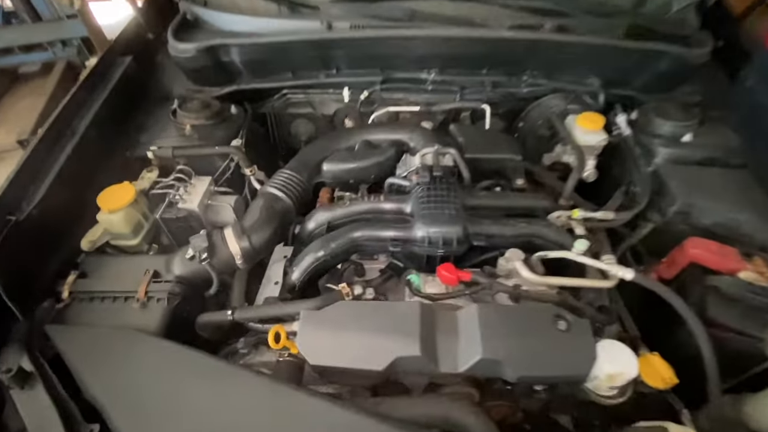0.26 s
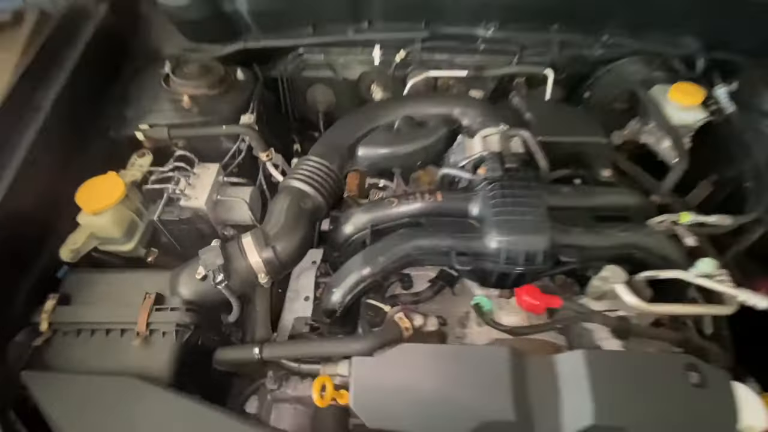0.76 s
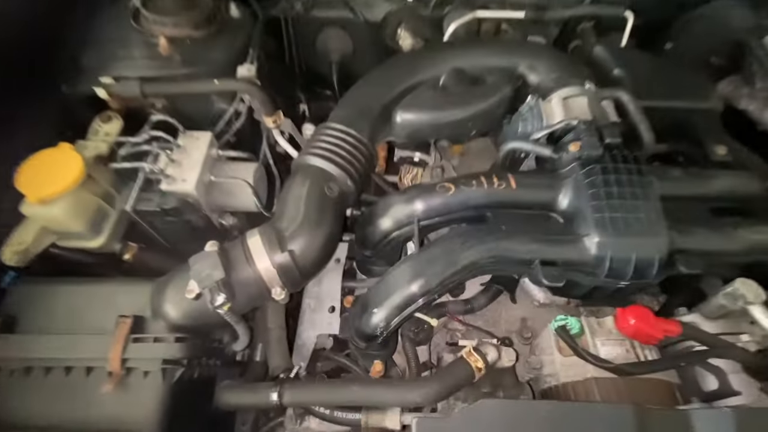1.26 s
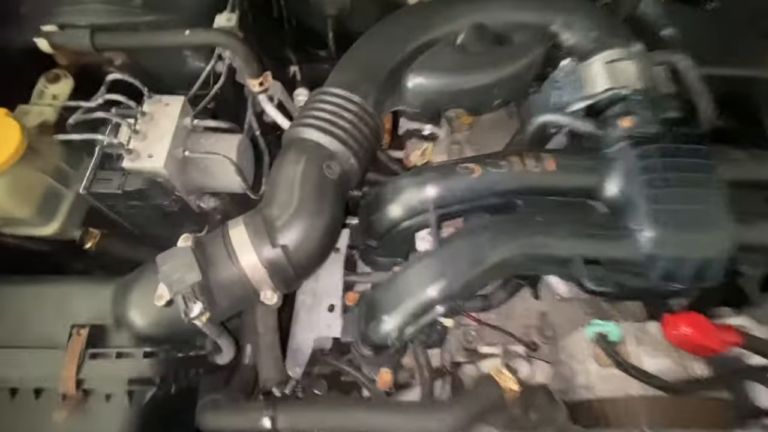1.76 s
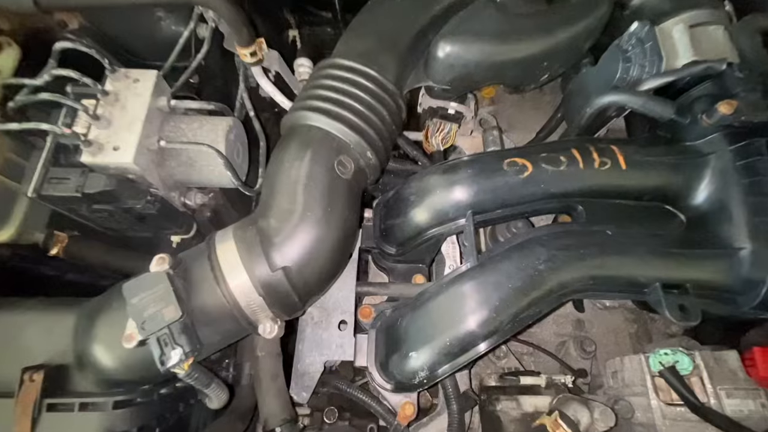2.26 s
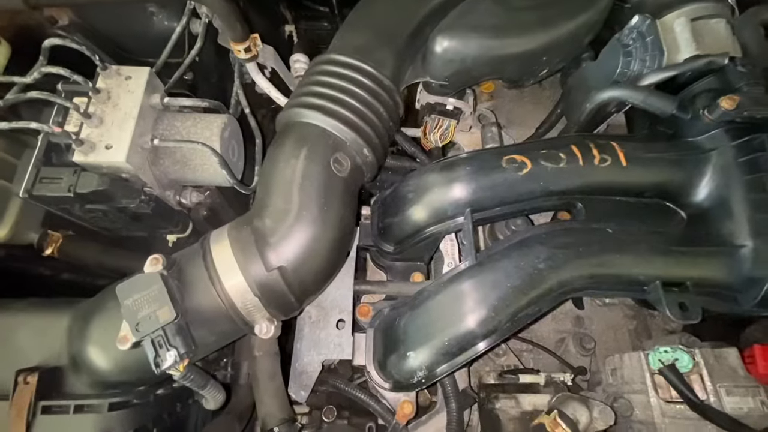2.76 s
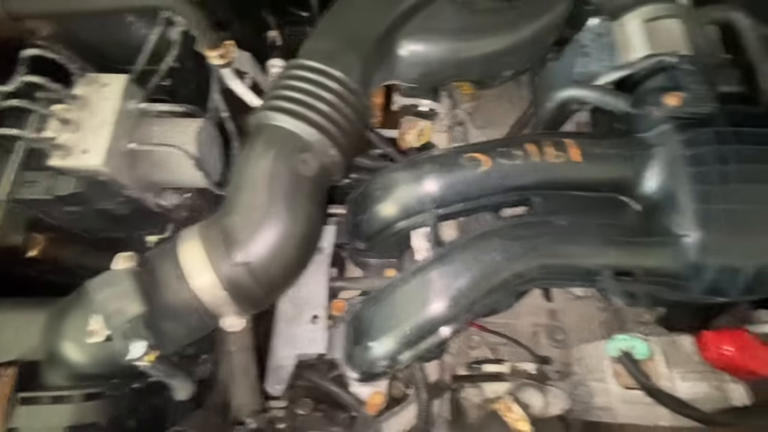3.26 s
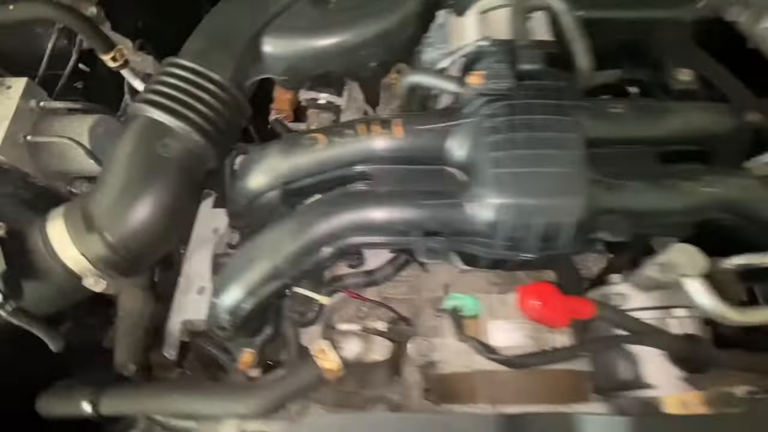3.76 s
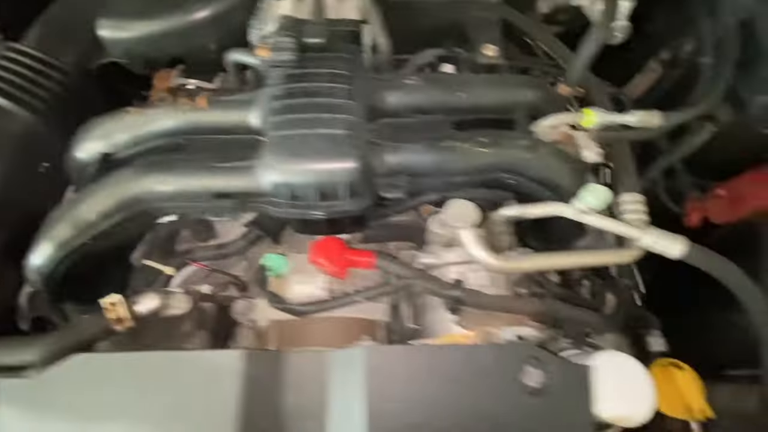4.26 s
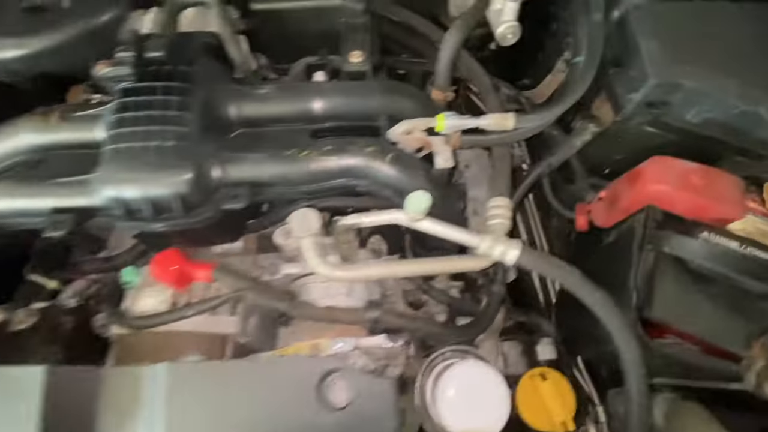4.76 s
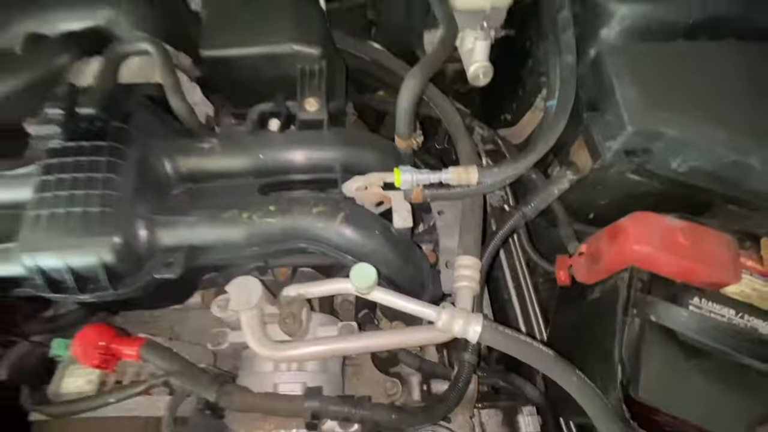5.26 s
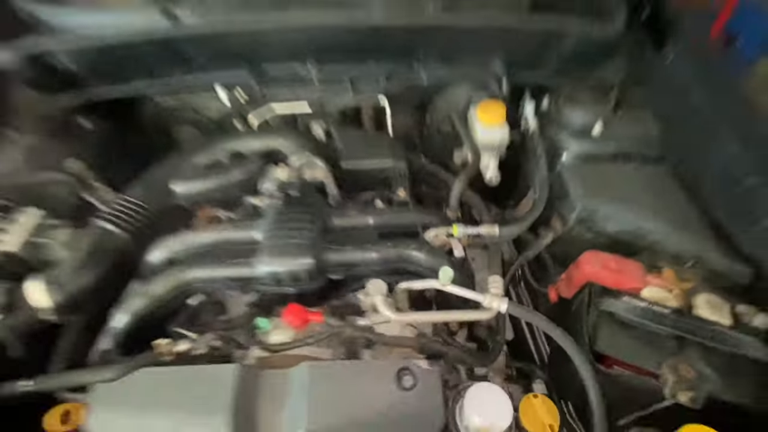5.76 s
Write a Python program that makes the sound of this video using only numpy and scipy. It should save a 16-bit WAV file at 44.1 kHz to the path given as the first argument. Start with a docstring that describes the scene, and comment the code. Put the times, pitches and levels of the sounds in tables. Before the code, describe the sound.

Rapid, hard metallic knocking runs without a break from a car engine at a fast, steady idle. Every clack carries a short ping and a hollow clank, over the engine's drone and a soft mechanical rush. The knock grows louder as the microphone nears the engine, changes colour as it passes across, and eases a little as it draws away. The garage adds a very short echo.

```python
"""A knocking engine in a garage

A four-cylinder car engine idles fast (about 1600 rpm), bonnet open. A worn rod bearing knocks once
every two turns: a steel clack, then the block and covers ring. The other cylinders slap lightly and
the firings hum. The microphone moves in from the bumper to the engine's left side, over to its right
side and back out; each place hears its own mix of the ringing tones."""
import sys
import numpy as np
from scipy import signal
from scipy.fft import rfft, irfft, next_fast_len
from scipy.io import wavfile

SR = 44100
rng = np.random.default_rng(int(sys.argv[2]) if len(sys.argv) > 2 else 0)


def generate_wav(signal):
    """Clip the signal to [-1, 1] and save it as 16-bit WAV at the path in sys.argv[1]."""
    frames = np.transpose(np.atleast_2d(signal))
    scaled = np.clip(frames, -1, 1) * 32767
    pcm = np.round(scaled).astype(np.int16)
    wavfile.write(sys.argv[1], SR, pcm)


N = 264688
TIME = np.arange(N) / SR
AGE = np.arange(SR // 11) / SR  # seconds since a blow


# tone colour of the clack: pitch_hz, level_db
CLACK_COLOUR = [(500, -21), (850, 0), (1500, -16), (2600, -4.5), (3800, -7.5), (4700, -1), (5600, -0.5),
                (6700, -5.5), (7700, -13), (9600, -8), (11500, -11.5), (13200, -16), (15300, -21.5)]
# how loud the clack is over time: time_s, level_db
CLACK_LOUDNESS = [(0, -23.5), (.8, -20.5), (1.6, -17), (2.3, -19), (3.1, -20), (3.75, -19.5), (4.1, -21.5),
                  (4.65, -22), (4.95, -21.5), (5.3, -22), (5.95, -26)]
# left channel minus right, heard from three places: bumper_db, left_side_db, right_side_db
CLACK_LEAN = [0, -2, 1.3]
# tones of the rod and crank: pitch_hz, ring_s, bumper_db, left_side_db, right_side_db
STEEL_TONES = [(3334, 0.064, -15, -6, -14), (3880, 0.022, -41, -34, -2), (4577, 0.038, -2.5, -22, -4),
               (4820, 0.013, 2, 3, -12.5), (5350, 0.013, -9, 0.5, -4.5), (5393, 0.022, -5.5, -5, -4),
               (5590, 0.025, -23, 3.5, -19), (6410, 0.017, -1, -21, -7.5)]

def rod_knock():
    """The loose rod hits the crank pin with a bright clack and a ping, then bounces and clacks again."""
    knocks = knock_times()
    clack_db = curves(CLACK_LOUDNESS, knocks)[0] + accents(knocks) + jitter(0.94, knocks)
    bounce_s = knocks + 0.0065 + jitter(0.0015, knocks)
    bounce_db = clack_db - 14.5 + jitter(3, knocks)
    bounce = bursts(bounce_s, bounce_db, decay(0.0005, 0.035), fresh=0.46, drift_hz=1.6)
    strike = bursts(knocks, clack_db + 3, decay(0.00072, 0.058), fresh=0.36 + 40 * AGE, drift_hz=1.753)
    clack = coloured(strike + bounce, CLACK_COLOUR)
    ring = ringing(knocks, STEEL_TONES, attack_s=0.0002, scatter_rad=0.62, scatter_db=2.5)
    ping = placed(knocks, clack_db, ring)
    return (clack + ping) * sides(heard(CLACK_LEAN, TIME))


# tone colour of the clang: pitch_hz, level_db
CLANG_COLOUR = [(250, -51), (400, -43), (600, -5), (820, -8), (1050, -10), (1450, 3), (1750, -3), (2020, 0),
                (2250, 0.5), (2450, 2), (2800, 0), (4000, -5.5), (8000, -22)]
# how loud the clang is: bumper_db, left_side_db, right_side_db
CLANG_LOUDNESS = [-29, -22, -25]

def block_clang():
    """The engine block clangs a few milliseconds after each knock."""
    knocks = knock_times()
    level_db = heard(CLANG_LOUDNESS, knocks) + 3.5 + accents(knocks) + jitter(1.1, knocks)
    envelope = decay(0.0008, 0.02) + amp(-9) * decay(0.002, 0.065)
    return coloured(bursts(knocks + 0.0036, level_db, envelope, fresh=0.17, drift_hz=3.536), CLANG_COLOUR)


# hollow tones of the covers: pitch_hz, ring_s, bumper_db, left_side_db, manifold_db, right_side_db
COVER_TONES = [(1310, .065, -29, -25, -18, -29), (1468, .055, -38, -14, -18, -27),
               (1598, .06, -31, -22, -15, -28), (1240, .05, -28, -36, -33, -30),
               (1362, .045, -19, -22, -28, -26), (1405, .045, -34, -25, -30, -19),
               (1517, .05, -32, -23, -28, -20), (1635, .045, -25, -23, -29, -26),
               (1730, .045, -30, -38, -38, -21)]
# blows on the covers: after_knock_s, bumper_db, left_side_db, right_side_db
COVER_HITS = [(.002, -1, -3.5, 0), (.00887, -12, -4, -8), (.0227, -11, -17, -15), (.0391, -16, -17, -13),
              (-.017, -13, -15, -16)]
# how loud the covers are over time: time_s, level_db
COVER_LOUDNESS = [(0, -1.5), (.7, -5), (1.3, 1), (1.9, 1), (2.7, -1), (3.3, -2), (3.8, -3.5), (4.3, -2.5),
                  (4.7, -3.5), (5.3, -4.5), (6, -5)]

def covers():
    """The knock, its rebound and the lighter slaps make the hollow covers clank."""
    return struck(COVER_TONES, COVER_HITS, COVER_LOUDNESS, attack_s=0.0022, scatter_rad=0.35)


# tones of the oil pan: pitch_hz, ring_s, bumper_db, left_side_db, manifold_db, right_side_db
PAN_TONES = [(1008, .065, -24, -16.5, -18.5, -33), (966, .055, -20, -36, -30, -22),
             (804.5, .07, -36, -36, -36, -31), (850, .05, -30, -31, -32, -34)]
# blows on the pan: after_knock_s, bumper_db, left_side_db, right_side_db
PAN_HITS = [(.0025, 0, 0, -1), (.0144, -22, -16, -1), (.0223, -7, -10, -11), (-.0183, -22, -12, -11)]
# how loud the pan is over time: time_s, level_db
PAN_LOUDNESS = [(0, -3), (.5, -2.5), (1.2, -0.5), (1.8, -2.5), (2.5, -3), (3.2, -2.5), (3.6, -6),
                (4.2, -5.5), (5.1, -2), (5.6, -3.5), (5.85, 0)]

def oil_pan():
    """The blows also ring the oil pan, lower in pitch than the covers."""
    return struck(PAN_TONES, PAN_HITS, PAN_LOUDNESS, attack_s=0.0031, scatter_rad=0.37)


# tones of the heads and brackets: pitch_hz, ring_s, bumper_db, left_side_db, manifold_db, right_side_db
BRACKET_TONES = [(1132, 0.038, -33, -38, -32.5, -33.5), (1992, 0.026, -26.5, -29, -22.5, -51),
                 (2046, .06, -29, -34, -27, -28.5), (2202, 0.043, -34.5, -38, -31, -27),
                 (2403, 0.065, -39, -33, -34, -27.5), (2823, 0.078, -34, -41, -46, -36),
                 (3060, .09, -49, -27.5, -31, -44)]
# blows on the brackets: after_knock_s, bumper_db, left_side_db, right_side_db
BRACKET_HITS = [(.002, 5.5, 4, 6.5), (.0227, 0, -9.5, -11), (0.044, -20, -7, -10), (-.018, -4.5, -6.5, -7)]
# how loud the brackets are over time: time_s, level_db
BRACKET_LOUDNESS = [(0, -5.5), (.7, -1), (1.5, -1), (2.6, -4.5), (3.5, -1.5), (4.4, 0), (5.1, -6),
                    (6, -8.5)]

def brackets():
    """The cylinder heads and brackets answer the blows with a thin, high ring."""
    return struck(BRACKET_TONES, BRACKET_HITS, BRACKET_LOUDNESS, attack_s=0.002, scatter_rad=0.85)


# light blows of the other cylinders: after_knock_s, level_db
SLAP_HITS = [(-.018, -5.5), (0.0229, -7.5), (0.0393, -21.5)]
# tone colour of a slap: pitch_hz, level_db
SLAP_COLOUR = [(300, -32.5), (650, -6), (820, 0), (1400, 1.5), (2100, 1.5), (3000, -3.5), (5200, -14),
               (7500, -19), (10000, -23.5), (15000, -35)]
# how loud the slaps are: bumper_db, left_side_db, right_side_db
SLAP_LOUDNESS = [-19.5, -19, -19]

def slaps():
    """The three healthier cylinders rattle between the knocks."""
    knocks = knock_times()
    rattle = 0
    for delay_s, hit_db in SLAP_HITS:
        starts = knocks + delay_s + jitter(0.0008, knocks)
        level_db = heard(SLAP_LOUDNESS, knocks) + hit_db + jitter(1.2, knocks)
        rattle += bursts(starts, level_db, decay(0.0025, 0.073), fresh=0.21, drift_hz=1.495)
    return coloured(rattle, SLAP_COLOUR)


# hollow tones of the engine bay: pitch_hz, ring_s, bumper_db, left_side_db, right_side_db
BAY_TONES = [(278, 0.031, -45, -47, -33.5), (357.7, 0.041, -48, -35, -38.5),
             (398.6, 0.069, -31, -30, -31.5), (439.5, 0.1, -33.5, -42, -38.5),
             (507, 0.044, -32, -33, -42.5)]
# the four firings of a cycle: after_knock_s, bumper_db, left_side_db, right_side_db
FIRINGS = [(.002, -2, -0.5, -0.5), (.022, -5, -6, -5), (.0385, -4, -2, -15.5), (-.021, -32, -20, -8)]
# how loud the chug is over time: time_s, level_db
CHUG_LOUDNESS = [(0, -7.5), (.7, -3), (1.3, 3.5), (2, -0.5), (2.7, -3), (3.6, -1.5), (4.2, -3.5), (5, -1.5),
                 (6, -7)]

def chug():
    """Each firing makes the engine bay boom; the firings are uneven, so it throbs once a cycle."""
    return struck(BAY_TONES, FIRINGS, CHUG_LOUDNESS, attack_s=0.0041, scatter_rad=0.13)


# tone colour of a thud: pitch_hz, level_db
THUD_COLOUR = [(70, -17), (140, -7.5), (210, 3), (290, -6), (400, 8), (530, -1), (610, -10.5), (760, 7),
               (1100, 3), (3000, -61)]
# how loud the thuds are: bumper_db, left_side_db, right_side_db
THUD_LOUDNESS = [-45.5, -40, -47]

def thuds():
    """Each firing also gives a dull thud."""
    knocks = knock_times()
    puffs = sum(bursts(knocks + delay_s, heard(levels, knocks), decay(0.002, 0.08),
                       fresh=0.12, drift_hz=0.76) for delay_s, *levels in FIRINGS)
    return amp(heard(THUD_LOUDNESS, TIME)) * unit(coloured(puffs, THUD_COLOUR))


# tones of the hum: waves_per_cycle, bumper_db, left_side_db, right_side_db
HUM_TONES = [(4, -50.5, -47.5, -53), (6, -71, -60, -75), (8, -50.5, -49, -50.5), (10, -66, -58, -58),
             (11, -59, -53, -62), (19, -72, -74, -59), (21, -57.5, -58, -46.5), (26, -52, -51, -52),
             (30, -46.5, -50.5, -49.5), (33, -47, -66, -47.5), (36, -52, -47, -59), (40, -51, -50, -59),
             (56, -48.5, -46, -46.5)]
# how loud the hum is over time: time_s, level_db
HUM_LOUDNESS = [(0, 0), (.7, 1.5), (1.4, 2), (2.2, 1), (3, -0.5), (3.6, -0.5), (4.4, -1.5), (6, -0.5)]

def hum():
    """The firings hum in low tones that follow the crank and peak roughly together after each knock."""
    knocks = knock_times()
    cycle_s = np.mean(np.diff(knocks))
    throb_lag_s = 0.00806
    position = cycles() - throb_lag_s / cycle_s
    out = np.zeros((2, N))
    for waves, *levels in HUM_TONES:
        hz = waves / cycle_s
        # higher tones reach the two channels further out of step
        split = stereo_angle(hz) * rng.choice([-1, 1]) * np.array([[1], [-1]])
        level_db = heard(levels, knocks) + curves(HUM_LOUDNESS, knocks)[0]
        gain = amp(np.interp(TIME, knocks, level_db)) * sides(at_pitch(STEREO_LEAN, hz))
        phase = 2 * np.pi * waves * position + 0.96 * rng.standard_normal()
        out += gain * np.sqrt(2) * np.sin(phase + split)
    return out


# tone colour of the whirr: pitch_hz, level_db
WHIRR_COLOUR = [(20, -25), (100, -12.5), (300, -18), (620, -17), (850, -5), (1500, 3), (2300, -4.5),
                (3300, -9), (5500, -11.5), (7700, -21), (10000, -20), (11800, -26), (13500, -27),
                (15500, -56)]

def whirr():
    """Belt, chain and valves make an even rush that swells a little where the clack is louder."""
    clack_db, = curves(CLACK_LOUDNESS, TIME)
    level_db = -31 + 0.44 * (clack_db - clack_db.mean())
    return amp(level_db) * coloured(rng.standard_normal((2, N)), WHIRR_COLOUR)


# how long the garage echoes: pitch_hz, ring_s
GARAGE_ECHO = [(200, 0.14), (1500, 0.12), (6000, 0.11), (14000, 0.048)]

def garage(sound):
    """The walls answer with a short, smeared echo."""
    hz, age, noise = signal.stft(rng.standard_normal((2, SR // 2)), SR, nperseg=256)
    fade = amp(-60 * age / at_pitch(GARAGE_ECHO, hz)[:, None])
    tail = signal.istft(noise * fade, SR, nperseg=256)[1]
    tail = np.pad(tail / np.linalg.norm(tail[0]), ((0, 0), (SR // 80, 0)))  # 12.5 ms late
    return signal.fftconvolve(sound, tail, axes=1)[:, :N]


# the slightly unsteady idle: time_s, speed_rpm
IDLE_SPEED = [(0.0, 1594.9), (0.4, 1610.5), (0.6, 1576.0), (0.8, 1594.9), (1.8, 1590.9), (2.0, 1601.2),
              (2.8, 1613.0), (3.2, 1592.8), (3.6, 1616.5), (4.4, 1599.3), (4.8, 1618.6), (5.0, 1598.0),
              (6.0, 1605.7)]

def cycles(first_knock_s=0.0104):
    """Count engine cycles since the first knock, two turns of the crank each."""
    rpm, = curves(IDLE_SPEED, TIME)
    done = np.cumsum(rpm / 120) / SR
    return done - np.interp(first_knock_s, TIME, done)


def knock_times():
    """The worn bearing knocks once in every cycle."""
    done = cycles()
    return np.interp(np.arange(np.ceil(done[-1])), done, TIME)


# knocks that land harder or softer than their neighbours: time_s, extra_db
ACCENTS = [(1.74, 0.4), (3.01, 1), (3.31, 1.3), (3.76, 0.5), (4.135, -1), (4.28, 1), (4.43, 1)]

def accents(times):
    """Extra decibels for the odd hard or soft knock."""
    return sum(db * (abs(times - at_s) < 0.03) for at_s, db in ACCENTS)


# the microphone's path: time_s, closeness (0 bumper, 1 over the engine), side (0 left, 1 right)
MIC_PATH = [(0, 0.25, 0.56), (.5, 0.098, 0.26), (1, 0.32, 0.21), (1.4, 0.64, 0.46), (1.9, 0.77, 0.15),
            (2.35, 0.89, 0.04), (3.1, 0.9, 0.029), (3.6, 0.64, 0.044), (4, 0.72, 0.92), (4.4, 1, 0.86),
            (5.3, 1, 0.94), (5.6, 0.98, 0.95), (6, 0.65, 1)]

def heard(values, times):
    """Blend the values for each place as the microphone moves; the manifold lies between the sides."""
    close, side = np.clip(curves(MIC_PATH, times), 0, 1)
    bumper, *near = values
    places = [0, 0.19, 1] if len(near) > 2 else [0, 1]
    return (1 - close) * bumper + close * np.interp(side, places, near)


def struck(tones, hits, loudness, attack_s, scatter_rad):
    """Ring one part of the engine with the same pattern of blows in every cycle."""
    knocks = knock_times()
    ring = ringing(knocks, tones, attack_s, scatter_rad, scatter_db=0.34)
    level_db, = curves(loudness, knocks)
    return sum(placed(knocks + delay_s, level_db + heard(levels, knocks) + jitter(0.78, knocks), ring)
               for delay_s, *levels in hits)


# how much later a ring reaches the left channel: bumper_s, left_side_s, right_side_s
LEFT_DELAY = [.00005, .00017, 0.00019]

def ringing(times, tones, attack_s, scatter_rad, scatter_db):
    """Add up a part's dying tones for each blow; they shift a little as the microphone moves."""
    lag_s = heard(LEFT_DELAY, times)[:, None] * np.array([[[-0.5]], [[0.5]]])
    ring = 0
    for hz, ring_s, *levels in tones:
        phase = 2.16 * drift(times, 0.687)[0] + jitter(scatter_rad, times)[:, None]
        phase = phase + 0.68 * drift(times, 1.57) + 2 * np.pi * hz * lag_s  # one per channel
        detune = 1 + 0.0027 * drift(times, 2.57)[0]
        fade_db = 0.5 * drift(times, 3.6)[..., 0]  # crossing the bay's loud and quiet spots
        level_db = heard(levels, times) + fade_db + jitter(scatter_db, times)
        gain = amp(level_db) * sides(at_pitch(STEREO_LEAN, hz))
        wave = np.sin(2 * np.pi * hz * detune * AGE + phase)
        ring += gain[..., None] * decay(attack_s, ring_s) * wave
    return np.sqrt(2) * ring


def bursts(times, db, envelope, fresh, drift_hz):
    """The bay's dense echoes as noise: part changes slowly, and the share `fresh` is new at each blow."""
    echoes = drift(times, drift_hz, size=len(AGE))
    fresh = np.clip(fresh, 0, 1)
    noise = np.sqrt(1 - fresh) * echoes + np.sqrt(fresh) * rng.standard_normal(echoes.shape)
    return placed(times, db, envelope * noise)


# which channel is louder: pitch_hz, left_minus_right_db
STEREO_LEAN = [(100, -1), (380, -4), (700, 1.5), (1300, -2), (2400, -3), (4600, 2.5), (6500, 3.5),
               (9000, -2.5), (15000, 1.5)]

def coloured(pair, colour):
    """Give two white noises a tone colour and the stereo spread of the engine bay."""
    size = next_fast_len(N + SR // 4, True)
    size += size % 2
    hz = np.fft.rfftfreq(size, 1 / SR)
    # build a filter that rings only after a blow, never before it
    cepstrum = irfft(np.log(unit(amp(at_pitch(colour, hz))) + 1e-6))
    response = np.exp(rfft(2 * cepstrum[:size // 2], size) - cepstrum[0])
    angle = stereo_angle(hz)
    mid, side = rfft(pair, size) * response * [np.cos(angle), np.sin(angle)]
    stereo = np.array([mid + side, mid - side]) * sides(at_pitch(STEREO_LEAN, hz))
    return irfft(stereo, size)[:, :N]


# how alike the two channels are: pitch_hz, likeness (1 same, -1 opposite)
STEREO_LIKENESS = [(100, 0.97), (290, 0.64), (640, 0.23), (1400, -0.07), (6800, 0.062), (10000, 0.62),
                   (12000, -1.1), (15000, 1)]

def stereo_angle(hz):
    """Turn likeness into an angle: 0 when both channels are the same."""
    return np.arccos(np.clip(at_pitch(STEREO_LIKENESS, hz), -1, 1)) / 2


def placed(times, db, shapes):
    """Lay one stereo shape per blow on the time line."""
    out = np.zeros((2, N + 2 * SR))
    for k, start_s in enumerate(times):
        start = SR + round(start_s * SR)
        out[:, start:start + len(AGE)] += amp(db[k]) * shapes[:, k]
    return out[:, SR:SR + N]


def decay(attack_s, ring_s):
    """One blow rises quickly to 1, then fades by 60 dB every ring_s."""
    shape = (1 - np.exp(-(AGE / attack_s) ** 2)) * amp(-60 * AGE / ring_s)
    return shape / shape.max()


def drift(times, rate_hz, size=1):
    """Smoothly changing random values, shaped (2, times, size)."""
    knots = np.arange(-2, 40)
    weight = np.exp(-(times[:, None] * rate_hz - knots) ** 2)
    weight /= np.linalg.norm(weight, axis=1, keepdims=True) + 1e-12
    return weight @ rng.standard_normal((2, len(knots), size))


def jitter(spread, times):
    """One random nudge per blow."""
    return spread * rng.standard_normal(len(times))


def curves(rows, times):
    """Read each column after the first at the given times."""
    row_s, *columns = np.transpose(rows)
    return [np.interp(times, row_s, column) for column in columns]


def at_pitch(rows, hz):
    """Read a table between its pitches, on a log scale."""
    pitches, values = np.transpose(rows)
    return np.interp(np.log(hz + 1), np.log(pitches + 1), values)


def sides(db):
    """Left and right gains for a level difference."""
    return amp(np.array([db, -db]) / 2).reshape(2, -1)


def amp(db):
    """Turn decibels into a gain."""
    return 10 ** (np.asarray(db) / 20)


def unit(x):
    """Scale to an average power of 1."""
    return x / np.sqrt(np.mean(x ** 2) + 1e-20)


def scene():
    """The metal blows and their garage echo, over the drone of the engine."""
    metal = rod_knock() + block_clang() + covers() + oil_pan() + brackets() + slaps()
    return metal + amp(-19) * garage(metal) + hum() + thuds() + chug() + whirr()


def record(dry):
    """Cut away the very highest treble."""
    top_hz = 15900
    size = next_fast_len(N + SR // 4)
    kept = np.fft.rfftfreq(size, 1 / SR) < top_hz
    return irfft(rfft(dry, size) * kept, size)[:, :N]


dry = scene()
out = record(dry)
generate_wav(out)
```